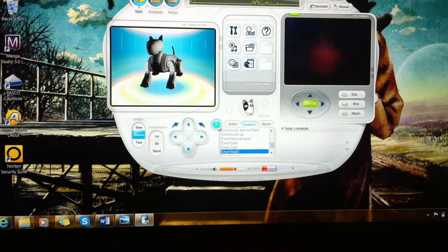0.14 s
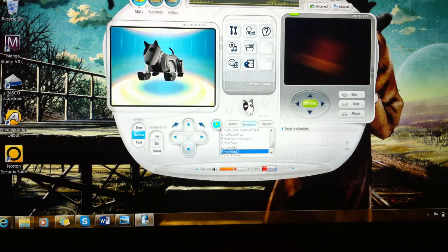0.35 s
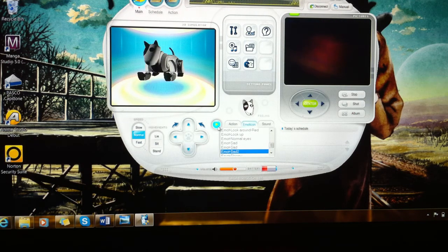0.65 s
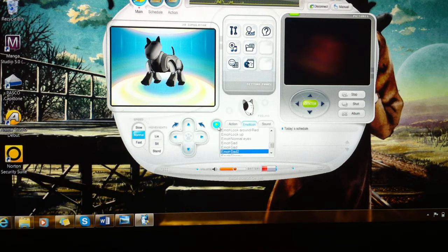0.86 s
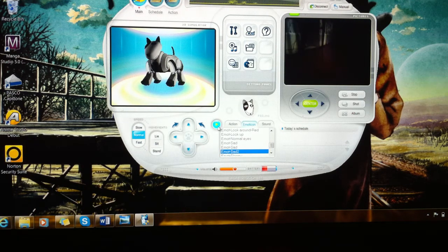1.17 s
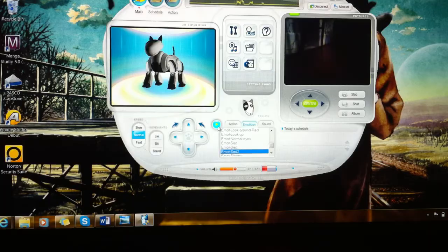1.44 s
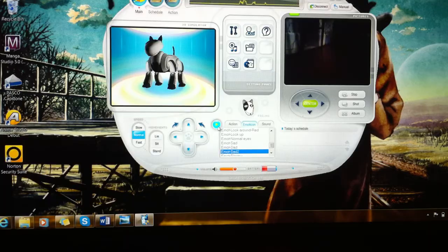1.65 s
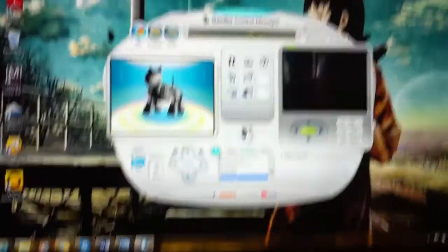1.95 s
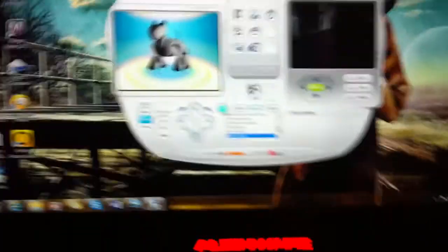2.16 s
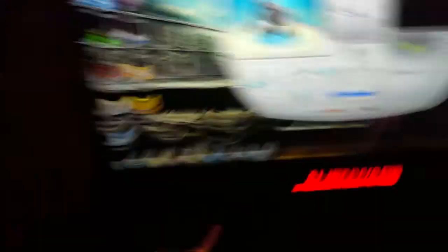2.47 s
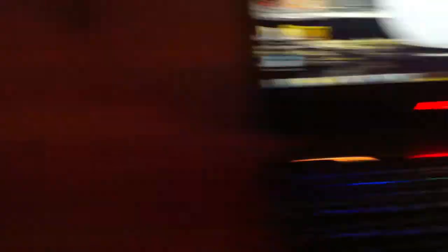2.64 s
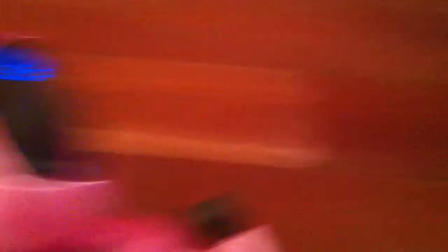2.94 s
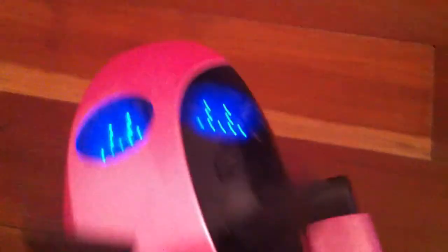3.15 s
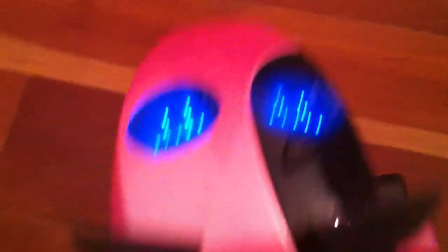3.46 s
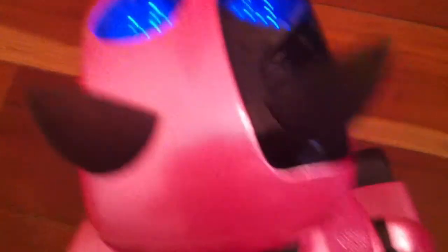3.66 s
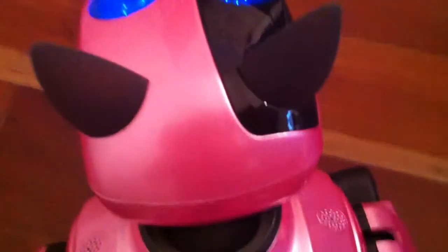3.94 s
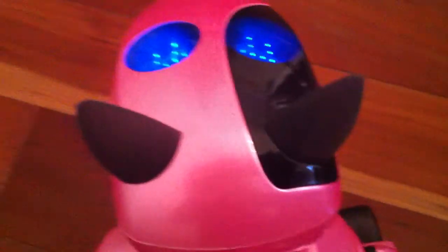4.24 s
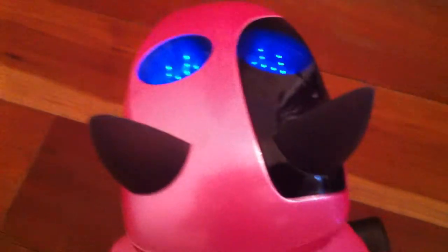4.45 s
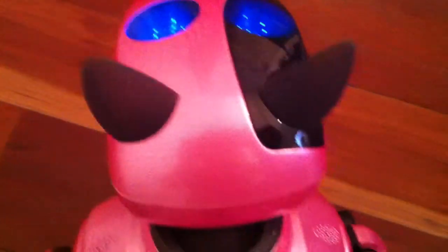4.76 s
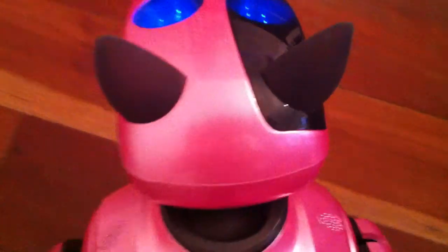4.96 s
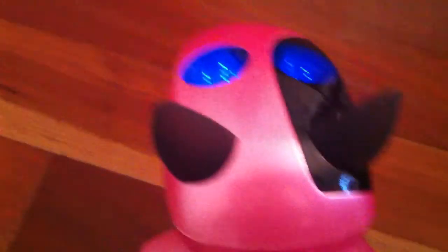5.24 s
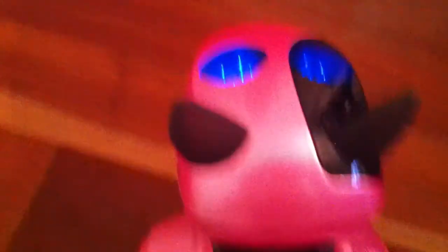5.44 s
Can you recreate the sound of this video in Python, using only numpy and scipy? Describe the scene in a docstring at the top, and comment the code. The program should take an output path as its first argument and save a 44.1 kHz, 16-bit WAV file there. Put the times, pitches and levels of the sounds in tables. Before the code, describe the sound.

A toy robot moves on a wooden floor in a small, fairly dry room. High leg servos whine with a gritty plastic rattle, pause, then step more softly. Hand-held camera bumps thud hard near two and a half seconds. Then a lower neck servo whirs in short bursts with chirps and clicks, over faint steady noise.

```python
"""Toy robot dog on a wooden floor

In a small room its leg servos push and step, then the neck servo swings and nods the head.
Impacts of plastic gear teeth, smeared inside the shell, make the rattle; sines locked to tooth rate, the whine.
Sine glides make squeaks, chirps and brief servo whines; noise bursts make clicks of gear slack.
A hand-held camera is bumped a few times: damped case modes plus a noise crack. Steady noise lies beneath."""
import sys
import numpy as np
from scipy import signal
from scipy.fft import rfft, irfft, next_fast_len
from scipy.io import wavfile
from scipy.ndimage import uniform_filter1d, map_coordinates

SR = 44100
rng = np.random.default_rng(int(sys.argv[2]) if len(sys.argv) > 2 else 0)


def to_wav(sig):
    """Store sig (one row per channel, or 1-D mono) as 16-bit WAV at the path in sys.argv[1].

    Samples outside -1..1 are clipped; the rate is SR.
    """
    pcm = np.clip(np.atleast_2d(sig), -1, 1) * 32767
    pcm = np.round(pcm).astype(np.int16)
    wavfile.write(sys.argv[1], SR, pcm.T)  # frames by channels


N = 246959


def amp(db):
    """Decibels to gain."""
    return 10 ** (np.asarray(db) / 20)


def unit(x):
    """x at rms 1."""
    return x / np.sqrt(np.mean(x ** 2) + 1e-20)


def along(points, hz):
    """(f/Hz, value) points read on a log frequency axis."""
    f, v = np.transpose(points)
    return np.interp(np.log(hz + 1), np.log(f + 1), v)


def curves(rows):
    """One value per sample for each column after the time."""
    s, *cols = np.transpose(rows)
    return [np.interp(np.arange(N) / SR, s, c) for c in cols]


def wobble(rate_hz):
    """A smooth random curve with rate_hz knots a second."""
    knots = rng.standard_normal(int(N * rate_hz / SR) + 4)
    return map_coordinates(knots, [np.arange(N) * rate_hz / SR])


def filtered(x, response):
    """x times a response of frequency."""
    n = x.shape[-1]
    m = next_fast_len(n + SR // 4)
    return irfft(rfft(x, m) * response(np.fft.rfftfreq(m, 1 / SR)), m)[..., :n]


def low_cut(x, corner_hz):
    """Third-order high-pass: removes deep bass from bumps and clicks."""
    return signal.sosfilt(signal.butter(3, corner_hz, "high", fs=SR, output="sos"), x)


def add(track, s, sound):
    """Mix a short sound into the track at time s."""
    part = track[round(s * SR):][:len(sound)]
    part += sound[:len(part)]


# background noise spectrum: f/Hz, level/dB (relative)
QUIET = [(25, -39), (91, -22.5), (129, -10.5), (253, -8.5), (410, -7.5), (5010, -16), (10900, -21.5),
         (15500, -23)]
QUIET_DB = -60.5  # rms


def quiet():
    """Steady coloured noise under the scene."""
    return amp(QUIET_DB) * unit(filtered(rng.standard_normal(N), lambda hz: amp(along(QUIET, hz))))


# room decay: f/Hz, t60/s
ROOM = [(200, 0.26), (2000, 0.034), (12000, 0.02)]


def room(x):
    """The small room's answer: a decaying noise tail whose treble dies first."""
    hz, t, z = signal.stft(rng.standard_normal(SR // 3), SR, nperseg=256)
    decay = amp(-60 * t / along(ROOM, hz)[:, None])
    tail = signal.istft(z * decay, SR, nperseg=256)[1]
    return signal.fftconvolve(x, tail / np.linalg.norm(tail))[:N]


# bumps: t/s, level/dB, brightness f/Hz, crack level/dB (re thud), ring time (share of the case's t60)
BUMPS = [(2.013, -35, 1110, .5, 0.4), (2.0646, -31.5, 3312, -1.5, 0.49), (2.401, -34, 446.7, -12, 1),
         (2.4583, -26, 970, -3, 0.75), (2.4663, -15.5, 894, -9, 0.85), (2.474, -30.5, 2183, 12.5, 0.32),
         (2.476, -9.5, 1039, -9.5, 0.98), (2.694, -39, 575, -16, 0.83), (3.146, -34, 408, -22, 1),
         (3.3965, -17.5, 630, -23, 0.45)]
# camera case modes: f/Hz, level/dB, t60/s
CASE = [(198, -11.5, 0.046), (292.9, -10.5, .029), (454.4, -9, 0.02), (738, -9.5, 0.035), (878, 0.5, 0.019),
        (1434, 0, 0.0076), (2470, 2, 0.01)]


def bumps():
    """Each bump rings the damped case modes, low-passed to its own brightness, and adds a noise crack."""
    out, t = np.zeros(N), np.arange(SR // 8) / SR
    for s, db, bright_hz, crack_db, ring_share in BUMPS:
        ring = np.zeros(len(t))
        for hz, level_db, t60_s in CASE:
            ring += amp(level_db - 60 * t / (t60_s * ring_share)) * np.sin(2 * np.pi * hz * t)
        thud = filtered(ring, lambda hz: 1 / (1 + np.sqrt(2) * 1j * hz / bright_hz - (hz / bright_hz) ** 2))
        crack = amp(crack_db - 60 * t / (0.024 * ring_share)) * rng.standard_normal(len(t))
        crack = filtered(crack, lambda hz: 1 / (1 + 1j * hz / 5000))
        add(out, s, amp(db) * (thud + crack))
    return low_cut(out, corner_hz=180.0)


# gear backlash clicks: t/s, level/dB (before the low cut), centre f/Hz
CLICKS = [(2.593, -40, 13030), (4.767, -41.5, 8800), (5.463, -28.5, 1848), (5.552, -31, 2218)]


def clicks():
    """A gear takes up its slack with a short plastic snap: a decaying band of noise."""
    out, t = np.zeros(N), np.arange(SR // 16) / SR
    for s, db, centre_hz in CLICKS:
        noise = rng.standard_normal(len(t))
        snap = unit(filtered(noise, lambda hz: 1 / (1 + ((hz / centre_hz - 1) / 0.67) ** 2)))
        add(out, s, amp(db - 60 * t / 0.022) * snap)
    return low_cut(out, corner_hz=705.3)


# glides: t/s, length/s, first f/Hz, last f/Hz, peak level/dB
GLIDES = [(.005, 0.051, 1366, 1554, -37.5), (1.4, 0.062, 677.6, 980, -51), (1.493, .065, 920, 708.4, -53),
          (2.489, 0.043, 325, 625, -45), (2.843, 0.028, 1333, 1554, -34.5), (2.879, .0295, 4970, 5000, -35),
          (3.249, 0.087, 2720, 2310, -36), (3.929, .015, 2160, 1963, -30.5), (3.935, .021, 1280, 1234, -36),
          (3.982, 0.017, 1610, 1649, -34.5), (4.069, 0.025, 2300, 2194, -32), (4.07, .026, 1835, 1760, -33),
          (4.092, 0.013, 1763, 1586, -34), (4.125, 0.02, 1770, 1780, -33), (5.206, 0.028, 1720, 1760, -36),
          (5.465, 0.012, 2379, 2461, -29.5), (5.544, 0.024, 2293, 1846, -34),
          (5.577, .018, 2833, 2340, -30.5)]


def glides():
    """Short unsteady sine glides: squeaks, chirps and brief servo whines."""
    out = np.zeros(N)
    for s, length_s, first_hz, last_hz, db in GLIDES:
        n = round(length_s * SR)
        hz = np.linspace(first_hz, last_hz, n) * (1 + 0.022 * wobble(380)[:n])
        swell = np.sin(np.linspace(0, np.pi, n))
        add(out, s, amp(db) * swell * np.sin(2 * np.pi * np.cumsum(hz) / SR))
    return out


# shell resonances: f/Hz, width/Hz, lift/dB
SHELL = [(672, 370, 3.5), (2090, 97, 3.5), (2810, 360, 2.5), (3590, 320, 3.5), (4500, 180, 2.5),
         (5660, 1300, 4.5), (9300, 270, 2)]


def shell_db(hz):
    """Lift that the plastic shell's resonances give to each frequency."""
    return sum(db / (1 + (2 * (hz - centre) / width) ** 2) for centre, width, db in SHELL)


# neck gear train: t/s, tooth rate f/Hz
NECK_GEAR = [(2.86, 1416), (3.0, 1130), (3.2, 1265), (3.39, 1290), (3.5, 1048), (3.69, 1031), (3.8, 993.3),
             (3.93, 900), (4.15, 897.5), (4.3, 1023), (5.06, 1020), (5.12, 1231), (5.24, 1265),
             (5.295, 758.4), (5.36, 1259), (5.43, 1429), (5.52, 1331), (5.6, 1131)]


def neck_speed():
    """The neck's tooth rate at each sample, in Hz."""
    return curves(NECK_GEAR)[0]


# moments when the gears bind and grind louder: t/s, level/dB (over the run)
BINDS = [(3.329, 4), (3.53, 3), (4.077, 4), (4.595, 8.5), (4.96, 5.5)]
BIND_S = 0.0052  # half-length of a bind (to 1/e of its dB)
COAST_DB_PER_S = 221  # decay after motor cut, for effort to the power 1
# envelope clock: t/s
ENVELOPE_S = np.arange(0, N / SR, .001)


def effort(run):
    """Gain of one run: the motor spins up, its load grows or eases, binds now and then, and it coasts."""
    start_s, stop_s, spin_up_s, _, swell_db = run[:5]
    progress = np.clip((ENVELOPE_S - start_s) / (stop_s - start_s), 0, 1)
    bind_db = sum(db * np.exp(-((ENVELOPE_S - s) / BIND_S) ** 2) for s, db in BINDS)
    coast_db = COAST_DB_PER_S * np.clip(ENVELOPE_S - stop_s, 0, 1)
    spin_up = np.clip((ENVELOPE_S - start_s) / spin_up_s, 0, 1)
    return spin_up * amp(swell_db * (progress - .5) + bind_db - coast_db)


# leg servo runs, may overlap: start t/s, stop t/s, spin-up/s, rattle level/dB, swell over the run/dB,
# treble level/dB (re rattle)
LEG_RUNS = [(-.03, .87, 0.027, -34.5, 3, -3), (.06, .245, 0.034, -40.5, 2.5, 6.5),
            (.31, .43, 0.025, -39.5, 3, -18.5), (.43, .6, 0.021, -46.5, 3, -14.5),
            (.485, .845, 0.047, -33.5, 4.5, 3.5), (.95, 1.375, .05, -65, 5.5, 2.5),
            (1.362, 1.87, 0.07, -42, -1.5, -6.5), (1.855, 1.99, 0.032, -42, -1, -3.5),
            (2.02, 2.15, 0.025, -60, 13, -7.5), (2.13, 2.39, 0.072, -53, -8.5, -5.5),
            (2.385, 2.62, 0.026, -51.5, -7.5, -6.5), (2.6, 2.77, 0.019, -58, -21, -8.5)]
# neck servo runs: the same columns, then whine level/dB (re rattle)
NECK_RUNS = [(2.808, 2.942, 0.028, -38, 1.5, 1, -23), (2.96, 3.096, 0.047, -41.5, 6, -5, -9),
             (3.093, 3.391, 0.028, -36.5, 1.5, -1.5, -8), (3.457, 3.674, 0.066, -34, -4, -7, -10.5),
             (3.674, 3.955, 0.031, -35.5, -1, -2.5, -8), (3.95, 4.155, 0.037, -35, -0.5, -4, -19),
             (4.205, 4.435, .052, -43, 11.5, -6, -17.5), (4.441, 4.498, .016, -42, -3.5, -0.5, -35),
             (4.517, 5.077, 0.041, -49, 0.5, -8.5, -10.5), (5.073, 5.239, 0.039, -35.5, 3, -3.5, -13),
             (5.293, 5.44, 0.04, -42.5, 9, -9.5, -8), (5.44, 5.596, 0.019, -37, 3.5, -2, -16)]
RATTLE, TREBLE, WHINE = 3, 5, 6  # run table columns


def loudness(runs, column=None, grows=1):
    """Gain of the rattle, or of the layer that a column sets against it; overlapping runs add in power."""
    gains = []
    for run in runs:
        level_db = run[RATTLE] + (run[column] if column else 0)
        gains.append(amp(level_db) * effort(run) ** grows)
    return np.interp(np.arange(N) / SR, ENVELOPE_S, np.linalg.norm(gains, axis=0))


def whine(rate_hz, orders, flutter, rough_db):
    """The gear mesh sings; play between the teeth shakes its pitch and strength."""
    phase = 2 * np.pi * np.cumsum(rate_hz * (1 + flutter * wobble(260))) / SR
    return unit(sum(amp(db + rough_db * wobble(140)) * np.sin(k * phase) for k, db in orders))


# leg gear trains through push and step: t/s, tooth rate f/Hz, whine level/dB (re rattle, before LEG_WHINE_DB)
LEAD_GEAR = [(.05, 3175, -9.5), (.305, 3240, -2.5), (.36, 2686, 0.5), (.415, 2566, -5), (.465, 2880, 3),
             (.5, 2737, 0), (.53, 3103, -1), (.61, 3555, -4), (.715, 3554, -2.5), (.825, 3890, -18),
             (.89, 3047, -6), (1.44, 3153, -21), (1.505, 2820, 3), (1.62, 2970, -11), (1.72, 3125, 1),
             (1.845, 2912, 0.5), (1.885, 3086, -2), (1.94, 2973, -3), (2.05, 3404, -25)]
SECOND_GEAR = [(.09, 3693, -7), (0.269, 3565, -3.5), (.39, 3790, -12), (.46, 2648, -18), (.575, 2786, -4.5),
               (.62, 3012, -6.5), (.77, 3104, -4), (.825, 3297, -12), (.878, 2758, -4), (1.3, 2994, -29),
               (1.48, 3310, -5), (1.62, 3184, -17), (1.78, 3230, -6), (1.99, 3367, -10), (2.05, 3390, -25)]
FAST_GEAR = [(0.019, 4650, -25), (.15, 4530, -1), (.3, 4450, -7), (.35, 4160, -4), (.41, 3800, -2),
             (.46, 4220, -24), (.58, 5153, -2), (.65, 5670, 1), (.81, 5680, -3), (.95, 5013, -28)]
# whine partials: multiple of the tooth rate, level/dB (relative)
LEG_ORDERS = [(.34, -10), (.52, -8), (1, 5.5), (2, -10)]
FAST_ORDERS = [(.343, -12), (1, 0)]
NECK_ORDERS = [(.667, -11), (1, 1), (1.333, -10), (2, -2.5), (3, -7), (4, -7), (5, -6)]
LEG_WHINE_DB = -2.5  # all leg whines together


def servos():
    """Each gear train whines at its own speed and follows the effort; the fastest has most play and rasps."""
    lead_hz, lead_db = curves(LEAD_GEAR)
    second_hz, second_db = curves(SECOND_GEAR)
    fast_hz, fast_db = curves(FAST_GEAR)
    lead = whine(lead_hz, LEG_ORDERS, flutter=.01, rough_db=4)
    second = whine(second_hz, LEG_ORDERS, flutter=.011, rough_db=3.5)
    fast = whine(fast_hz, FAST_ORDERS, flutter=.022, rough_db=4)
    legs = amp(lead_db) * lead + amp(second_db) * second + amp(fast_db) * fast
    neck = whine(neck_speed(), NECK_ORDERS, flutter=.018, rough_db=4.5)
    neck = unit(filtered(neck, lambda hz: amp(shell_db(hz))))  # partials swell as they cross a resonance
    return amp(LEG_WHINE_DB) * loudness(LEG_RUNS) * legs + loudness(NECK_RUNS, WHINE) * neck


HUNT = .012  # share by which a servo's speed hunts around its goal


def teeth(rate_hz, worn, count):
    """One impact per tooth; part of its size and its lateness recur with every turn of a count-tooth wheel."""
    passed = np.cumsum(rate_hz * (1 + HUNT * wobble(14) + .009 * wobble(40))) / SR
    k = np.arange(int(passed[-1]))
    worn = np.clip(worn, 0, 1)
    wear = rfft(rng.standard_normal((2, count)))
    flat = wear / np.abs(wear) * (np.arange(wear.shape[1]) > 0)  # no harmonic of the turn stands out
    wheel = irfft(flat, count)
    size, late = np.sqrt(worn) * unit(wheel)[:, k % count]
    size = size + np.sqrt(1 - worn) * rng.standard_normal(len(k))
    at = np.interp(k + .3 * late, passed, np.arange(N))
    return unit(np.bincount(np.round(at).astype(int), size, N))


def scattered(x):
    """Impacts bounce inside the shell for a few milliseconds: an all-pass smear that keeps their colour."""
    t = np.arange(SR // 40) / SR
    paths = rfft(rng.standard_normal(len(t)) * amp(-60 * t / .02))
    return signal.fftconvolve(x, irfft(paths / np.abs(paths)))[:N]


def patchy(x, depth_db):
    """Random soft patches of gain over time and frequency make the rattle uneven."""
    z = signal.stft(x, nperseg=1024)[2]
    field = uniform_filter1d(rng.standard_normal(z.shape), size=4, axis=0)
    field = uniform_filter1d(field, size=5, axis=1)
    return signal.istft(z * amp(depth_db * unit(field)), nperseg=1024)[1][:N]


def treble(hz):
    """High-pass magnitude that splits the fizz from the body at 7.5 kHz."""
    return 1 / (1 + (7500 / (hz + 1)) ** 12)


def midrange(hz):
    """The band that carries the rattle's level."""
    return (hz > 1300) & (hz < 7000)


# colour of the joint at work in each move: f/Hz, level/dB (relative)
PUSH = [(80, -45), (200, -20.5), (420, -22), (850, -8.5), (1700, -8.5), (2350, -6.5), (3100, 1), (5600, -3),
        (7500, -7.5), (9500, -6.5), (13000, -6), (15500, -7)]
STEP = [(80, -40), (200, -26), (420, -22), (850, -9.5), (1700, -10.5), (2450, -10.5), (3100, 0.5),
        (4000, -10), (5600, -9.5), (8200, -21), (9300, -15), (11000, -19), (15500, -19.5)]
SETTLE = [(80, -17), (200, -6), (450, -11), (900, -3), (4000, -5), (7000, -13), (13000, -10), (15500, -14)]
SWING = [(80, -17), (200, -9), (450, -3.5), (800, 3), (1300, 9), (2300, 8.5), (3100, 4), (4400, 12.5),
         (6000, -1), (8000, -15), (10000, -13.5), (15500, -18.5)]
NOD = [(150, -37), (380, -28), (700, -11.5), (2100, -1), (3100, -7.5), (4700, -3.5), (5700, -12.5),
       (7500, -19.5), (10000, -2.5), (11500, -7), (15500, -5.5)]
LIFT = [(150, -44), (380, -13.5), (700, -0.5), (2000, 4), (3100, 1), (5400, 1.5), (7200, -17), (11000, -21),
        (13500, -13.5), (15500, -20.5)]
HOLD = [(80, -24), (200, -39), (400, -16.5), (900, -3.5), (2050, 4), (3200, -5.5), (4600, -3),
        (7000, -17.5), (10000, -12.5), (12000, -19), (15500, -14.5)]
TURN = [(80, -36), (200, -25.5), (340, -11), (700, -4), (2600, 2.5), (3100, -3), (5200, 3), (7000, -19),
        (10000, -23.5), (15500, -27.5)]
# moves: start t/s, colour
MOVES = [(0, PUSH), (1.2, STEP), (2.07, SETTLE), (2.79, SWING), (3.451, NOD), (3.98, LIFT), (4.535, HOLD),
         (5.07, TURN)]
TREBLE_GROWS = 1.5  # dB of treble per dB of effort
LOAD_DB = 0.92  # slow unevenness of the load


def rattle():
    """Tooth impacts and sliding flanks sound through the shell, in the colour of the joint that moves."""
    runs = LEG_RUNS + NECK_RUNS
    level = loudness(runs)
    treble_level = loudness(runs, TREBLE, TREBLE_GROWS)
    lead_hz, second_hz = curves(LEAD_GEAR)[0], curves(SECOND_GEAR)[0]
    t = np.arange(N) / SR
    legs = scattered(teeth(lead_hz, worn=0.4, count=28))
    legs = legs + scattered(teeth(second_hz, worn=0.49, count=15))
    neck = scattered(teeth(neck_speed(), worn=.4, count=9))
    neck = neck + scattered(teeth(neck_speed(), worn=.4, count=6))
    impacts = np.where(t < NECK_RUNS[0][0], unit(legs), unit(neck))
    sliding = .45 * rng.standard_normal(N)
    drive = unit(patchy(impacts + sliding, depth_db=2.2))
    drive = drive * amp(LOAD_DB * wobble(30) + 0.12 * wobble(170))
    body, fizz = np.zeros(N), np.zeros(N)
    for start_s, colour in MOVES:
        joint = filtered(drive, lambda hz: amp(along(colour, hz) + shell_db(hz)))
        high = filtered(joint, treble)
        low = (joint - high) / np.std(filtered(joint, midrange))
        takeover = np.clip((t - start_s) / 0.018 + 1, 0, 1)  # each joint fades in over the one before
        body += takeover * (low - body)
        fizz += takeover * (unit(high) - fizz)
    return level * body + treble_level * fizz


def scene():
    """The toy in its room and the bumps on the camera, alike in both channels."""
    toy = rattle() + servos() + glides() + clicks()
    handling = bumps()
    reverb = room(amp(-11.5) * toy + amp(-38.0) * handling)
    mono = toy + handling + reverb + quiet()
    return np.array([mono, mono])


TOP_HZ = 15780


def record(dry):
    """The camera keeps nothing above its band limit."""
    return filtered(dry, lambda hz: hz < TOP_HZ)


dry = scene()
out = record(dry)
to_wav(out)
```